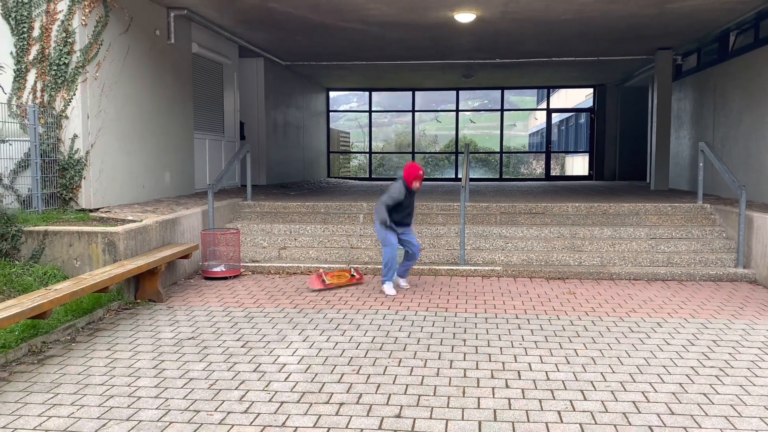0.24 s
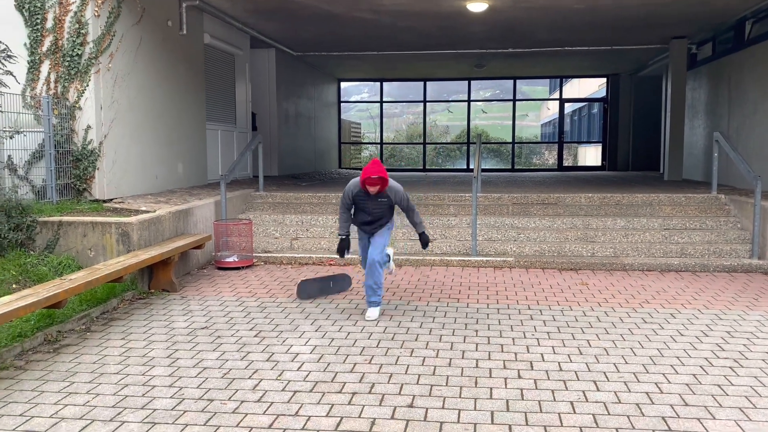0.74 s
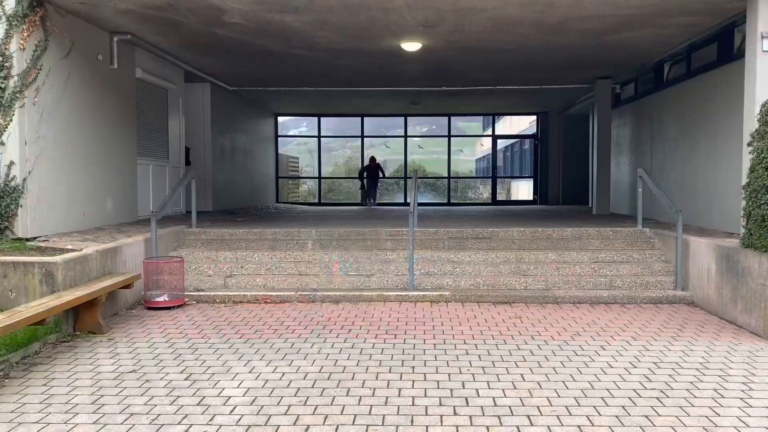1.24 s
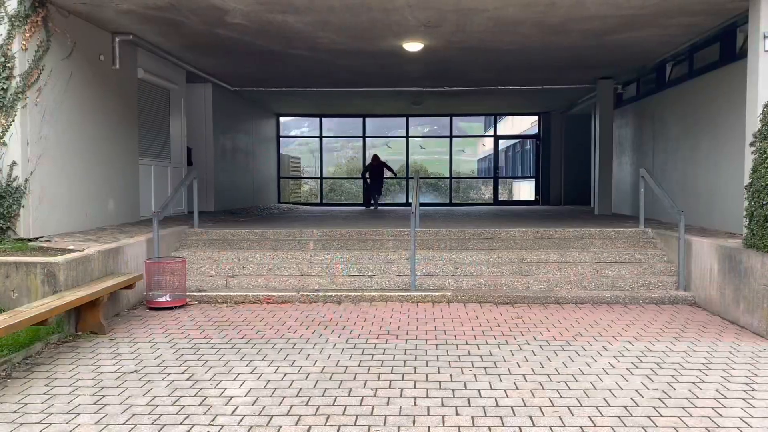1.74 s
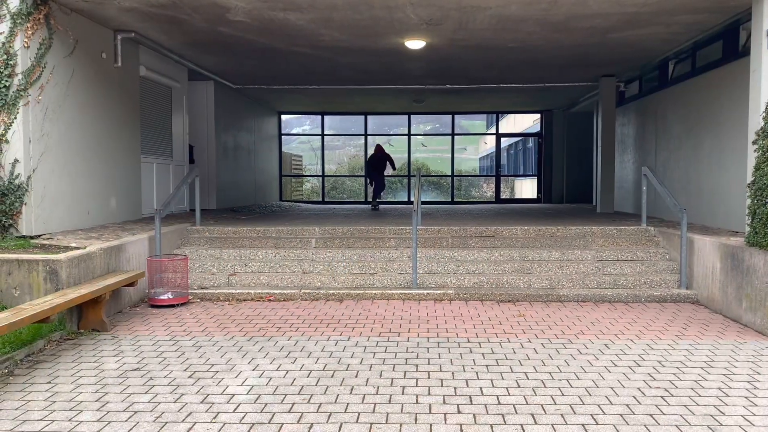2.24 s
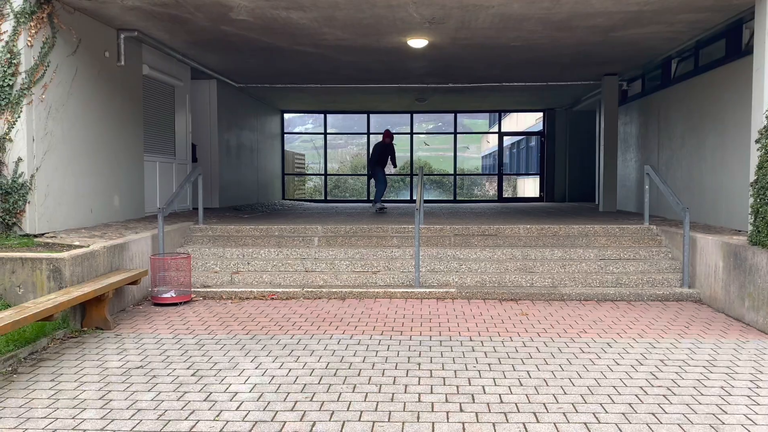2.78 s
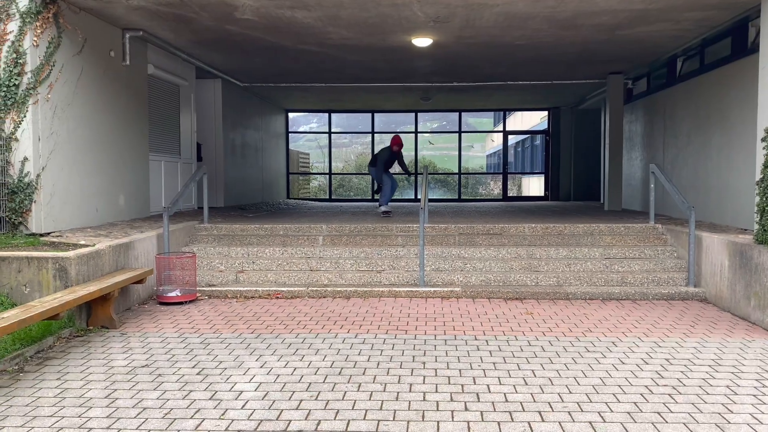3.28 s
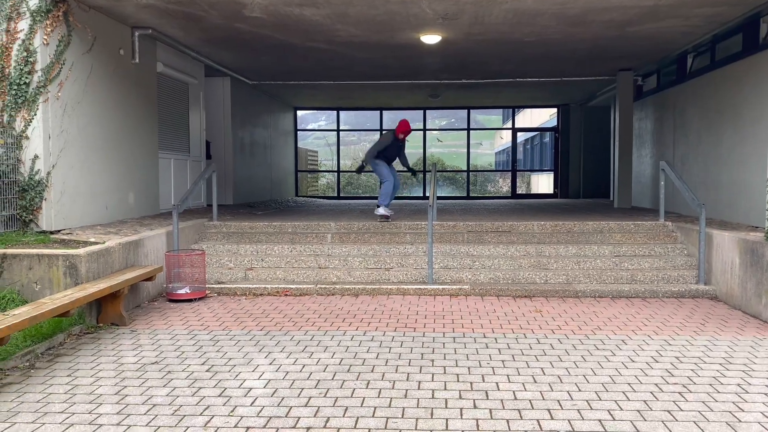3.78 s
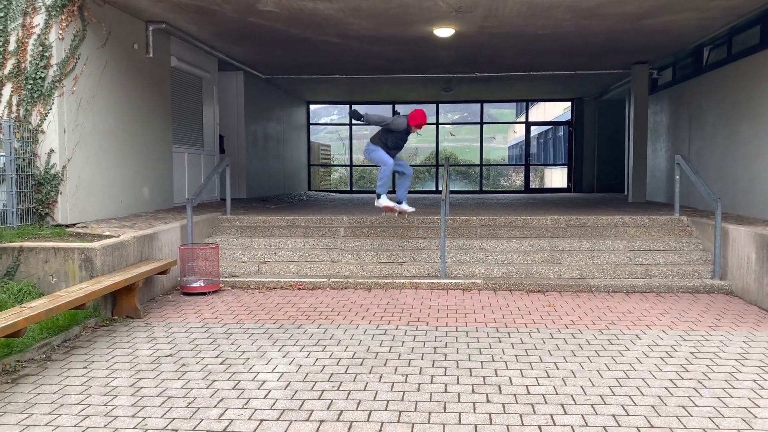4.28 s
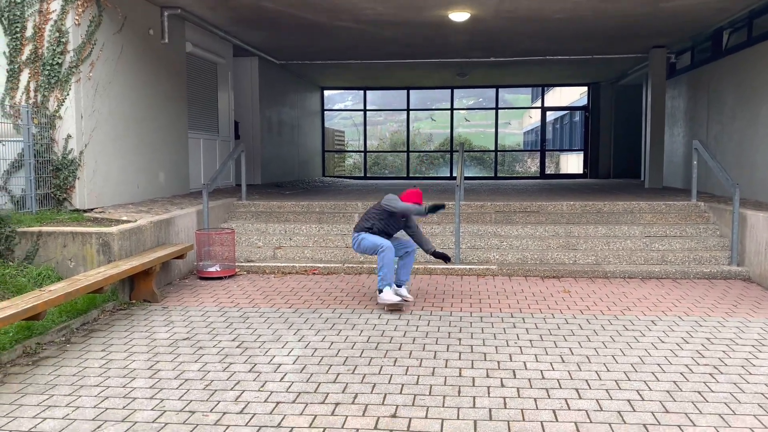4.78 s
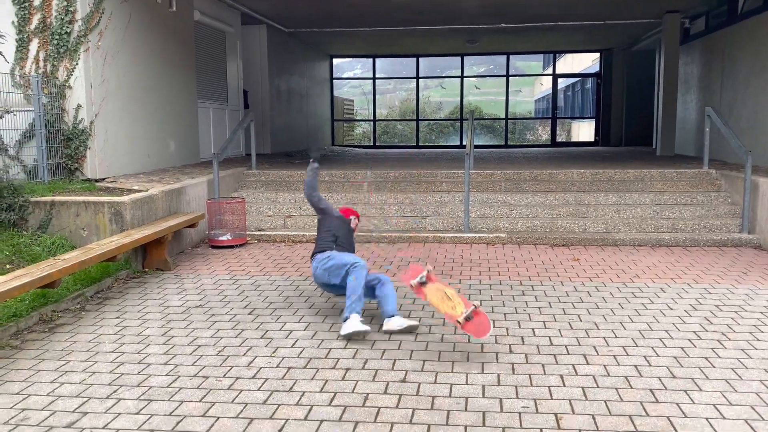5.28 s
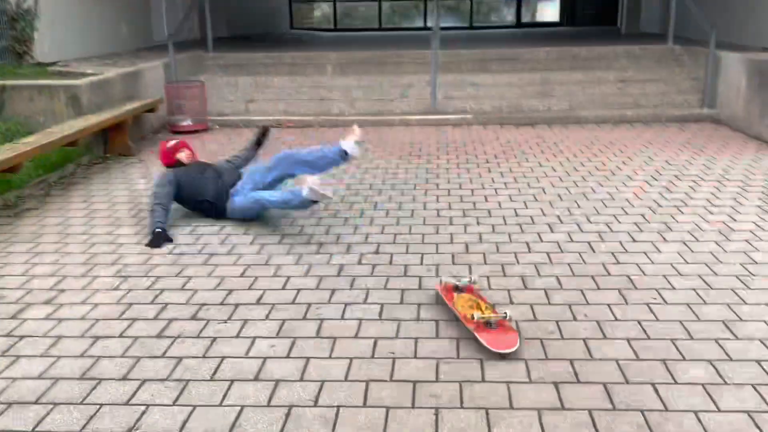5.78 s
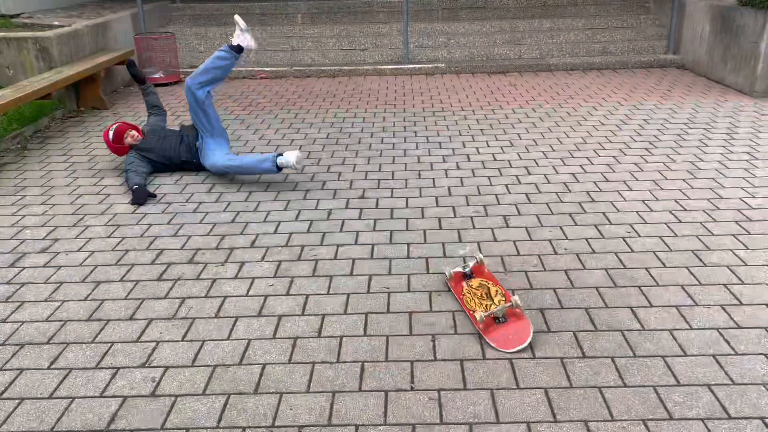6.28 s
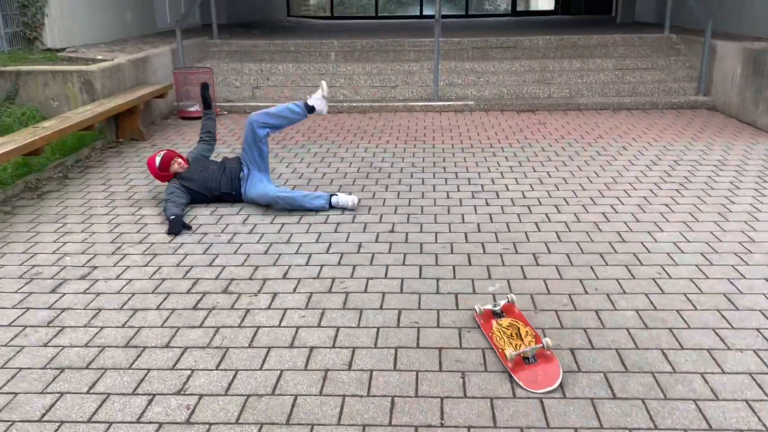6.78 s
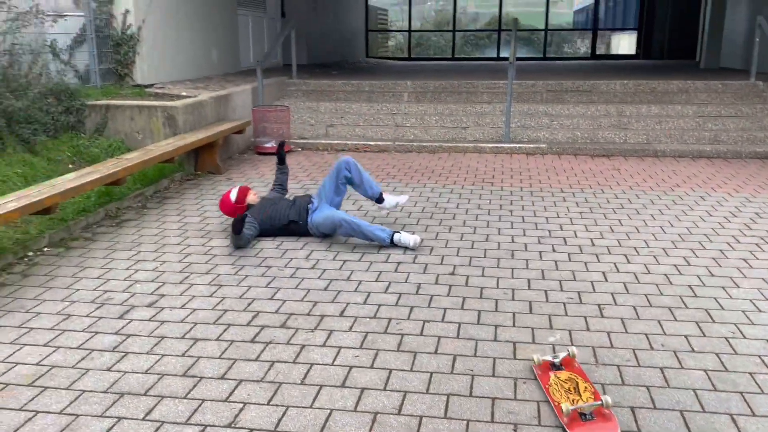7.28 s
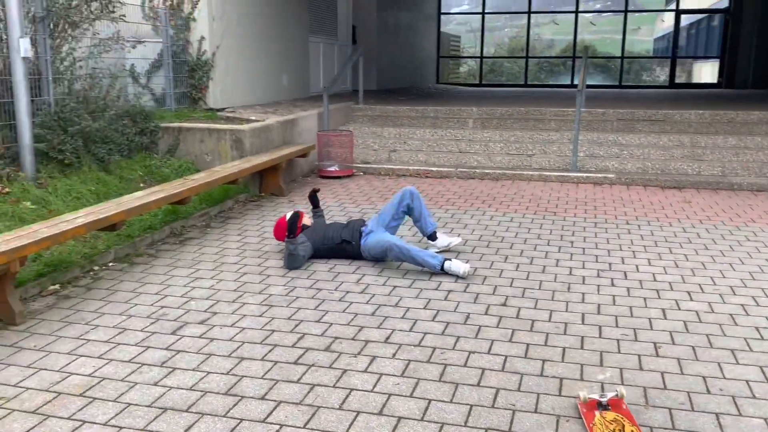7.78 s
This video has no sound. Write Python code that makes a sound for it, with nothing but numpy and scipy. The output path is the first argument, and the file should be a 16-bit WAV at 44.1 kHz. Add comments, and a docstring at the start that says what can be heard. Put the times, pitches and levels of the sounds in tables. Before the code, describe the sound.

A skateboard clatters down with whirring wheels, then after a cut it rolls, pops, slams down and tumbles in an echoing concrete passage.

```python
"""A skateboard clatters down at the foot of a stairway while its free wheels whirr; then a cut to a second attempt.
The board is thrown down in an echoing concrete passage, rolls closer, jolts over seams and pops off the ground.
It lands, slips away and tumbles onto its back, the rider falls, and the wheels spin on under gusts of wind.
Blows are contact noise ringing deck and truck modes; rolling and whirring are coloured, modulated noise;
shoes and body are damped swings, cloth is grainy noise, and decaying noise makes the echoes."""
import sys
import numpy as np
from scipy import signal
from scipy.fft import rfft, irfft, next_fast_len
from scipy.io import wavfile
from scipy.ndimage import uniform_filter1d, map_coordinates

SR = 44100
rng = np.random.default_rng(int(sys.argv[2]) if len(sys.argv) > 2 else 0)


def log_audio(samples):
    """Write samples as a 16-bit WAV file to the path given in sys.argv[1]."""
    # one column per channel
    frames = np.atleast_2d(samples).T
    # limit to full scale, then quantise
    limited = np.clip(frames, -1, 1)
    pcm = np.round(limited * 32767).astype(np.int16)
    wavfile.write(sys.argv[1], SR, pcm)


N = 354123
TIME = np.arange(N) / SR
CUT_S, ROCKING_S = 1.28, 4.7  # cut between the attempts; from the second time the board lies on its back
SKID_RING = 0.46  # factor on the deck's decay times in skids and jolts

# likeness of left and right in the passage: pitch_hz, likeness (0 to 1)
HALL_SAME = [(60, 0.7), (130, 0.98), (290, 0.96), (640, 0.13), (1300, 0.79), (3100, 0.047), (7000, 0.082)]
# spectrum of the passage echo: pitch_hz, level_db
HALL_TONE = [(60, -13.5), (150, -2.5), (280, 5.5), (450, 1), (1000, 3.5), (1900, 2), (3000, -4),
             (5000, -18), (7000, -20.5), (11000, -33), (16000, -49)]


def amp(db):
    """Turns decibels into a linear gain."""
    return 10 ** (np.asarray(db) / 20)


def evened(x):
    """Scales a sound to rms 1."""
    return x / np.sqrt(np.mean(x ** 2) + 1e-20)


def burst(x):
    """Scales a blow to the energy of six milliseconds at full level."""
    return x / np.sqrt(np.sum(x ** 2) / (.006 * SR) + 1e-20)


def read(points, hz):
    """Reads a table of values over log frequency."""
    f, value = np.transpose(points)
    return np.interp(np.log(hz + 1), np.log(f + 1), value)


def add(mix, s, sound):
    """Lays a sound into the mix at a time in seconds."""
    part = mix[..., max(round(s * SR), 0):][..., :sound.shape[-1]]
    part += sound[..., :part.shape[-1]]


def held(start, end, fade=0.04):
    """Attack, hold and release in straight lines."""
    return np.interp(TIME, [start - fade, start, end, end + fade], [0, 1, 1, 0])


def since(s):
    """Seconds gone by after a moment, zero before it."""
    return np.maximum(TIME - s, 0)


def colour(x, points, peaks=()):
    """Causal minimum-phase filter from a spectrum and a few resonances (Hz, width Hz, rise dB)."""
    hz = abs(np.fft.fftfreq(8192, 1 / SR))
    db = read(points, hz) + sum(rise / (1 + (2 * (hz - f) / width) ** 2) for f, width, rise in peaks)
    response = np.exp(np.conj(signal.hilbert(np.log(amp(db)))))
    taps = np.fft.ifft(response).real[:len(hz) // 2]
    taps = taps.reshape((1,) * (x.ndim - 1) + (-1,))
    return signal.oaconvolve(x, taps, axes=-1)[..., :x.shape[-1]]


def band(x, lo_hz, hi_hz):
    """Cuts out a band and scales it to rms 1."""
    edges = [lo_hz, min(hi_hz, SR / 2 - 1)]
    return evened(signal.sosfilt(signal.butter(3, edges, "band", fs=SR, output="sos"), x))


def pair(same, size):
    """Two channels of noise, as alike in each band as the table says."""
    padded = next_fast_len(size)
    a, b = rfft(rng.standard_normal((2, padded)))
    likeness = np.clip(read(same, np.fft.rfftfreq(padded, 1 / SR)), -.99, .99)
    mid, side = a * np.sqrt((1 + likeness) / 2), b * np.sqrt((1 - likeness) / 2)
    return irfft([mid + side, mid - side], padded)[:, :size]


def wobble(hz):
    """Random motion of rms 1, slower than about the given rate."""
    size = next_fast_len(N)
    slow = np.exp(-(np.fft.rfftfreq(size, 1 / SR) / hz) ** 2)
    return evened(irfft(rfft(rng.standard_normal(size)) * slow, size)[:N])


def smoothed(x, width_hz):
    """Spreads the energy of a burst of noise evenly over frequency."""
    size = next_fast_len(2 * len(x))
    z = rfft(x, size)
    power = uniform_filter1d(abs(z) ** 2, size=max(int(width_hz * size / SR), 1))
    return irfft(z / np.sqrt(abs(power) + 1e-20), size)[:len(x)]


def resonate(x, hz, width):
    """A resonance of gain 1 that follows a pitch curve."""
    turn = np.exp(2j * np.pi * np.cumsum(hz) / SR)
    r = np.exp(-np.pi * width / SR)
    # shift the pitch down to zero, smooth there, shift back
    return 2 * (turn * signal.lfilter([(1 - r) ** 2], [1, -2 * r, r * r], x / turn)).real


def outdoors():
    """Distant steady air with a faint hum, and lumpy gusts that swell and ebb on the microphone."""
    # distant air: pitch_hz, level_db
    air_tone = [(25, -24), (60, -3), (130, -7), (280, -5.5), (450, -15), (700, -12), (1500, -21),
                (4000, -34), (8000, -47), (15000, -63.5)]
    # wind on the microphone: pitch_hz, level_db
    wind_tone = [(20, -29.5), (50, 4.5), (85, 2.5), (150, -6), (250, -14.5), (500, -35.5), (1200, -66.5)]
    # gusts: peak_s, level_db, half_length_s
    gust_list = [(0.01, -33.5, 0.09), (0.3, -37.5, 0.17), (0.742, -37, 0.3), (1.17, -22.5, 0.067),
                 (4.654, -46.5, 0.12), (5.376, -36, 0.17), (5.782, -39, 0.033), (5.994, -49.5, 0.65),
                 (6.979, -33.5, 0.052), (7.236, -36.5, 0.14)]
    air = amp(-49.5) * evened(colour(pair(HALL_SAME, N), air_tone, [(124.0, 56, 13.4)]))
    air = air * amp(np.interp(TIME, [6.9, 7.5], [0, -4]))
    hum = amp(-66) * np.sin(2 * np.pi * 587 * TIME) * held(CUT_S, ROCKING_S)
    wind = evened(colour(pair([(25, 0.62), (70, 0.99), (300, 0.42)], N), wind_tone))
    wind = wind * amp(1.8 * wobble(5.5))
    gusts = np.sqrt(sum((amp(db) * np.exp(-((TIME - s) / half) ** 2)) ** 2 for s, db, half in gust_list))
    return air + hum + wind * gusts * amp([[1.], [-1.]])


def tail(t60s, build, same):
    """A diffuse echo that builds up and dies band by band."""
    hz, t, z = signal.stft(pair(same, 2 * SR), SR, nperseg=512)
    response = signal.istft(z * amp(-60 * t / read(t60s, hz)[:, None]), SR, nperseg=512)[1]
    response = response * (1 - np.exp(-np.arange(response.shape[1]) / SR / build))
    return response / np.sqrt(np.mean(abs(rfft(response)[:, 1000:5000]) ** 2))


def echo(x, response):
    """Passes a sound through a room response."""
    return signal.oaconvolve(np.atleast_2d(x), np.atleast_2d(response), axes=1)[:, :N]


def scattered(power, spread=0.034):
    """Steps and ceiling scatter each blow into a short wash before the passage rings with it."""
    # share sent into the passage, falling as the board comes out towards the microphone: time_s, level_db
    hall_send = [(.2, -6), (1.9, -2), (2.25, -10.5), (5., -10.5), (6.3, -17.5)]
    t = np.arange(SR // 2) / SR
    shape = burst(t * np.exp(-t / spread)) ** 2
    envelope = np.sqrt(abs(signal.oaconvolve(power, shape)[:N]))
    wash = evened(colour(rng.standard_normal(N), HALL_TONE, [(267, 19, 3.4)]))
    return envelope * wash * amp(np.interp(TIME, *np.transpose(hall_send)))


def at_the_stairs(x):
    """Colours the first attempt by its place."""
    # bare board at the foot of the stairs, its top dulled by distance: pitch_hz, level_db
    stairs_tone = [(150, -1), (250, 2.5), (400, -1.5), (700, 3), (1100, -1), (2000, -0.5), (3000, 1.5),
                   (4200, 0), (6500, -2.5), (11000, 1)]
    return colour(x * (TIME < CUT_S), stairs_tone) + x * (TIME >= CUT_S)


def to_the_right(x):
    """The board starts on the left and ends on the right, where it reaches the left port later."""
    # delay of the left port: time_s, delay_ms
    left_lag = [(1.27, -.07), (1.29, -.018), (4.6, -.015), (5.5, 0), (6.3, .05), (8., .11)]
    lag = np.interp(TIME, *np.transpose(left_lag)) / 1000
    left = map_coordinates(x[0], [(TIME - lag) * SR], order=3, mode="nearest")
    return np.array([left, x[1]])


def rider(slap=0.68, rub_low=0.55, rub_high=1.26, rub_grain_db=3.0):
    """Dull thuds of shoes and body, each a damped swing with a soft slap, and short grainy brushes of cloth."""
    # soft blows of shoes and body: start_s, level_db, pitch_hz, give_s
    thuds = [(0.188, -14.5, 253, 0.0072), (0.55, -21, 228, 0.0029), (0.683, -16, 279, 0.012),
             (0.8, -18, 244, 0.012), (0.911, -25, 131, 0.0072), (1.083, -24.5, 255, 0.0061),
             (1.169, -37.5, 238, 0.0093), (1.464, -35.5, 288, 0.0085), (2.25, -12, 195, 0.015),
             (3.855, -7.5, 201, 0.019), (4.545, -15, 212, 0.0049), (4.87, -18, 217, 0.013),
             (5.307, -16, 182, 0.0062), (5.366, -20.5, 192, 0.0087), (5.399, -25.5, 148, 0.014),
             (5.828, -25.5, 166, 0.013), (7.195, -41, 348, 0.0047), (7.428, -41, 297, 0.0023),
             (7.459, -44, 268, 0.0021), (7.636, -44, 283, 0.002)]
    # cloth and soles brushing the ground: start_s, length_s, level_db, centre_hz
    brushes = [(0.392, 0.0079, -40.5, 6960), (1.459, 0.044, -56.5, 2340), (1.704, 0.28, -63.5, 2410),
               (3.873, 0.013, -30, 3080), (5.085, 0.026, -41.5, 3160), (5.191, 0.073, -45.5, 5450),
               (5.321, 0.015, -42, 6000), (5.366, 0.078, -34, 2430), (6.471, 0.011, -37.5, 1400),
               (6.958, 0.011, -51, 3200), (7.191, .012, -45, 1000), (7.194, 0.034, -52, 2785),
               (7.364, 0.0045, -52, 5660), (7.427, 0.012, -46, 1500), (7.918, 0.08, -40.5, 2430),
               (8, 0.013, -38, 1840)]
    # sole or cloth meeting the ground: pitch_hz, level_db
    slap_tone = [(30, -16.5), (110, 1.5), (250, 5), (600, -9), (1100, -14), (2500, -36), (9000, -76)]
    t, out = np.arange(SR // 5) / SR, np.zeros(N)
    for s, db, hz, give in thuds:
        push = t * np.exp(-t / give)
        contact = evened(colour(rng.standard_normal(len(t)), slap_tone))
        add(out, s, amp(db) * burst(push * (np.sin(2 * np.pi * hz * t) + slap * contact)))
    for s, length, db, hz in brushes:
        fibres, catches = rng.standard_normal((2, SR // 3))
        catching = amp(rub_grain_db * evened(uniform_filter1d(catches, size=200)))
        rub = evened(band(fibres * catching, hz * rub_low, hz * rub_high)[:int(length * SR)])
        add(out, s, amp(db) * rub * signal.windows.tukey(len(rub), .6))
    return out


def stomps():
    """The rider's feet land on the deck: each bends it, and it swings back in a low knock."""
    # landing feet: start_s, level_db
    feet = [(2.059, -16), (2.108, -16), (2.134, -21), (2.165, -18)]
    flex_hz, flex_t60_s, sole_s = 283, 0.051, 0.004  # bending mode of the deck; give of a sole
    t, out = np.arange(SR // 5) / SR, np.zeros(N)
    knock = np.sin(2 * np.pi * flex_hz * t) * (1 - np.exp(-t / sole_s)) * amp(-60 * t / flex_t60_s)
    for s, db in feet:
        add(out, s, amp(db) * burst(knock))
    return out


def spinning(fade_out_s=0.18):
    """Loudness and speed of the free wheels: spins fade at their own rates, and louder ones weigh more in the speed."""
    # wheels leave the ground spinning: start_s, level_db, fade_db_per_s (negative swells), turns_per_s
    spins = [(0.22, -43, 3, 42), (0.48, -29.5, 21, 35), (4.25, -47.5, 1.5, 50), (5.03, -35.5, -2, 32),
             (5.749, -25, 13.5, 37), (6.3, -44.5, 0, 24)]
    spin_up_s, grazed_s, graze_db_per_s = 0.025, 5.88, 22.5  # rise; the tumble then brakes earlier spins
    powers = []
    for s, db, fade, turns in spins:
        braking = graze_db_per_s * since(grazed_s) * (s < grazed_s)
        gain = amp(db - fade * since(s) - braking) * np.minimum(since(s) / spin_up_s, 1)
        if s < CUT_S:
            gain = gain * np.clip((CUT_S - TIME) / fade_out_s, 0, 1)
        powers.append(gain ** 2 + 1e-14)
    total = np.sum(powers, axis=0)
    speed = np.transpose(spins)[-1] @ np.array(powers) / total
    return np.sqrt(total), speed


def free_wheels(whirr=0.12, ball_ticks=0.17, fizz_db=-26.0, fizz_db_per_turn=7.0):
    """Bearings whirr in the air, throbbing with each turn and each passing ball; faster wheels fizz more."""
    # bearing noise: pitch_hz, level_db
    bearing_tone = [(250, -22), (600, -10), (850, -9), (1000, -2), (1500, -7), (2300, -10.5), (2650, -23.5),
                    (3300, -21), (4000, -30.5), (5300, -33.5), (6900, -28), (8300, -40.5), (11000, -37.5),
                    (16000, -52.5)]
    # its resonances: pitch_hz, width_hz, rise_db
    bearing_rings = [(1129, 140, 5.5), (1700, 45, 4.5), (3195, 58, 6), (6300, 560, 5)]
    full_fizz_turns = 33  # turns a second from which the fizz grows no more
    far_fizz_db = -15  # the first attempt's fizz hardly carries from the foot of the stairs
    gain, speed = spinning()
    turns = np.cumsum(speed * (1 + 0.016 * wobble(5))) / SR
    throb = 1 + whirr * np.sin(2 * np.pi * turns) + ball_ticks * np.sin(2 * np.pi * 2.2 * turns)
    noise = pair([(600, 0.12), (1200, 0.63), (3000, 1.0), (7000, 0.4)], N)
    sound = evened(colour(noise, bearing_tone, bearing_rings))
    wavering = (TIME + 0.0012 * wobble(4)) * SR  # the pitch wavers
    sound = np.array([map_coordinates(channel, [wavering], mode="nearest") for channel in sound])
    speed_db = fizz_db_per_turn * np.minimum(speed - full_fizz_turns, 0)
    fizz_gain = amp(fizz_db + speed_db + far_fizz_db * (TIME < CUT_S))
    fizz = band(rng.standard_normal((2, N)), 5500, 11000) * fizz_gain
    flutter = amp(1.3 * wobble(12))
    return (sound + fizz) * throb * flutter * gain


def drone():
    """The floor shakes the deck's bending resonance, which sinks under the crouching rider's weight."""
    # the loaded deck: time_s, pitch_hz, level_db
    drone_path = [(2.7, 316.5, -25.5), (3.05, 306, -24), (3.22, 234, -36), (3.45, 190, -23.5),
                  (3.65, 152, -33), (3.82, 112, -23.5), (3.96, 105, -47)]
    s, hz, db = np.transpose(drone_path)
    t, out = np.arange(s[0], s[-1], 1 / SR), np.zeros(N)
    swing = evened(resonate(rng.standard_normal(len(t)), np.interp(t, s, hz), 29))  # 29 Hz wide
    add(out, s[0], swing * amp(np.interp(t, s, db)) * signal.windows.tukey(len(t), .05))
    return out


def rolling(bump_db=0.6, sparkle_db=2.0, joint_db=3.5, coarse_db=1.35):
    """Wheels run over countless small bumps; grit crackles under them, and paving joints make it rougher."""
    # rolling noise: pitch_hz, level_db
    roll_tone = [(21, -92), (35, -27), (107, -9.5), (177, 1.5), (318, 1.5), (584, -5), (1250, -5),
                 (4120, -38.5), (6500, -40), (8160, -45.5), (9270, -60), (10000, -55.5), (11300, -53.5),
                 (13200, -65), (15000, -51)]
    # standing waves of the passage: pitch_hz, width_hz, rise_db
    booms = [(114.5, 23, 7.5), (169, 32, 1.5), (317, 45, 1), (654, 32, 4)]
    run_up_s, coast_s, crouch_s, pop_s = 2.3, 3.1, 3.43, 3.96  # on the board, last push, knees bent, take-off
    touchdown_s, slip_s = 4.59, 4.98  # the short ride on the paving
    paving = held(touchdown_s, slip_s)
    surge_db = 0.6
    roughness_db = bump_db * wobble(56) + surge_db * wobble(7.8) + joint_db * paving * wobble(87)
    road = colour(pair(HALL_SAME, N) * amp(roughness_db), roll_tone, booms)
    roar = band(road, 510, 2130) * amp(coarse_db * wobble(33))
    rumble = band(road, 26, 330)
    grit = band(road, 2900, 15500) * amp(sparkle_db * wobble(320))
    # loose trucks and bearings rattle at speed and calm down in the coast
    rattle = evened(band(road, 1120, 1980) * amp(5.0 * wobble(60)))

    # the board gathers speed until the last push, then coasts to the mouth of the passage
    coasted, pushing = since(coast_s), np.maximum(coast_s - TIME, 0)
    run_up = roar * amp(-18 - 1 * pushing - 6.5 * coasted)
    run_up = run_up + rumble * amp(-22.5 + 0.7 * (TIME - coast_s))  # grows as the board comes closer
    run_up = run_up + grit * amp(-33.5 - 4.5 * coasted)
    run_up = run_up + rattle * amp(-35 - 29 * coasted)
    crouch = band(road, 60, 118) * amp(-37) * held(crouch_s, pop_s)  # the loaded deck rumbles deeper

    ride = roar * amp(-24.5) + rumble * amp(-33) + grit * amp(-38.5)
    nearing = amp(11.5 * np.minimum(TIME - slip_s, 0))  # grows louder up to the slip, in dB per s
    return run_up * held(run_up_s, pop_s) + crouch + drone() + ride * paving * nearing


def blow(force, hz, thump_db, crack_db, ring, favoured=(), dense=0.74,
         knock_t60=0.035, thump_t60=0.077, crack_t60=0.065, octaves=1.0):
    """A contact force rings the deck; each place of contact favours other modes."""
    # maple deck with its trucks: pitch_hz, level_db, t60_s
    deck = [(727, 4, 0.066), (950, -1.5, 0.074), (1005, 0.5, 0.11), (1171, 0, 0.095), (1510, 0, 0.0096),
            (1530, 1.5, 0.049), (1720, 0.5, 0.03), (1945, 0.5, 0.049), (2220, 3, 0.03), (2372, -5.5, 0.084),
            (2710, 0.5, 0.036), (3530, -3, 0.01), (3920, -7.5, 0.027), (4500, -13.5, 0.025)]
    # the deck bending: pitch_hz, level_db
    thump = [(40, -30), (120, -20.5), (250, 4), (350, -4.5), (470, -1), (620, -10), (1000, -40)]
    # its dense upper modes: pitch_hz, level_db
    knock = [(200, -32), (600, 2), (1000, 1), (2000, -3), (3000, -8), (4500, -22.5), (9000, -61)]
    # grit crushed at contact: pitch_hz, level_db
    crack = [(1500, -31), (3000, 8), (3800, 6), (4700, 0.5), (5400, -3.5), (6800, -5.5), (8200, -20.5),
             (11000, -28), (16000, -43.5)]
    t = np.arange(len(force)) / SR
    modes = np.zeros(len(t))
    # a random place shifts each mode's level and pitch and sets its sign
    place = rng.standard_normal((len(deck), 2)) * [1.5, 1]
    for (f, db, t60), (a, b) in zip(deck, place):
        swing = np.sign(b) * np.sin(2 * np.pi * f * (1 + 0.023 * b) * t)
        modes += amp(db + a - 60 * t / (t60 * ring)) * swing
    contact = smoothed(force * rng.standard_normal(len(t)), 300)
    modes = signal.fftconvolve(modes, contact)[:len(t)]

    def dying(spectrum, t60):
        """Modes too dense to tell apart: coloured noise that dies away after the force."""
        power = signal.fftconvolve(force ** 2, amp(-120 * t / t60))[:len(t)]
        noise = np.sqrt(abs(power)) * rng.standard_normal(len(t))
        return burst(colour(smoothed(noise, 400), spectrum))

    # the hardness of the contact centres the ring on one region
    grid = np.geomspace(100, 16000, 24)
    focus = np.transpose([grid, -6 * np.minimum((np.log2(grid / hz) / octaves) ** 2, 3)])
    wood = burst(colour(burst(modes) + dense * dying(knock, knock_t60 * ring), focus, favoured))
    return wood + amp(thump_db) * dying(thump, thump_t60) + amp(crack_db) * dying(crack, crack_t60 * ring)


def truck_ring(unevenness_db=3.5):
    """Metal modes of the trucks; each blow favours other ones."""
    # metal trucks: pitch_hz, level_db, t60_s
    trucks = [(2660, 0.5, 0.032), (3560, -10.5, 0.047), (3820, 2.5, 0.025), (4340, 2, 0.012),
              (4530, -3.5, 0.03), (4960, -7, 0.033), (5850, -8.5, 0.035), (6470, -14, 0.03)]
    t = np.arange(SR // 10) / SR
    place = rng.standard_normal((len(trucks), 2))
    ringing = np.zeros(len(t))
    for (hz, db, t60), (a, b) in zip(trucks, place):
        decay = amp(db + unevenness_db * a - 60 * t / t60)
        ringing += decay * np.sign(b) * np.sin(2 * np.pi * hz * t)
    return burst(ringing)


def jolts(direct):
    """The wheels jolt over seams in the passage floor, cushioned by their softness."""
    # seams: start_s, level_db
    seams = [(2.655, -13.5), (2.763, -30), (2.906, -19), (2.925, -19), (2.979, -14), (3.048, -15.5),
             (3.111, -15.5), (3.178, -16), (3.209, -18), (3.292, -18), (3.533, -14.5)]
    # cushioning of the soft wheels: pitch_hz, level_db
    jolt_tone = [(1750, 0.5), (2400, -12), (6000, -4)]
    t = np.arange(SR // 18) / SR
    for s, db in seams:
        force = t * np.exp(-t / 0.00057)  # contact time in s
        jolt = blow(force, hz=1380, thump_db=-12, crack_db=-20, ring=SKID_RING)
        add(direct, s, amp(db) * colour(jolt, jolt_tone))


def bending(s, db):
    """Thump relative to its blow: harder contacts are shorter, so the bass grows more slowly than the clack."""
    full_db, growth = -18.5, 0.59  # thump of a full-level skid; dB it gains per dB of skid
    return full_db + (growth - 1) * db - 6.5 * (s > ROCKING_S)  # on its back the board bends less


def skids(direct, power):
    """Glancing blows of wheels or an edge, whose contact force swells and ebbs while the skid damps the deck."""
    # skids: start_s, level_db, centre_hz, swell_s, crack_db (relative to the blow)
    skid_list = [(0.222, -12.5, 3300, 0.00068, -5), (0.258, -16.5, 1990, 0.0018, -12),
                 (0.691, -17, 1230, 0.007, -13), (0.783, -21, 1160, 0.004, -8.5),
                 (0.976, -27, 1460, 0.0052, -12), (1.914, -14, 1850, 0.0047, -11.5),
                 (1.94, -19.5, 1310, 0.0039, -21), (2.031, -6.5, 2220, 0.0032, -14),
                 (2.063, -9, 1590, 0.0095, -15), (2.235, -8, 1110, 0.01, -11.5),
                 (2.262, -3.5, 1160, 0.015, -20.5), (4.044, -19, 1870, 0.0071, -18),
                 (4.621, -18.5, 1350, 0.0044, -18), (4.645, -16, 1410, 0.0059, -22),
                 (4.885, -14.5, 1200, 0.0036, -18), (5.612, -17.5, 1850, 0.0053, -16),
                 (5.789, -23, 1090, 0.0031, -14), (5.931, -18.5, 1180, 0.0033, -16.5),
                 (5.987, -23.5, 1530, 0.0039, -22)]
    t = np.arange(SR // 9) / SR
    for s, db, hz, swell, crack_db in skid_list:
        rise = (t / swell) ** 0.97
        force = rise * np.exp(-rise * 2 / 3)
        add(direct, s, amp(db) * blow(force, hz, bending(s, db), crack_db, SKID_RING))
        add(power, s, amp([db]) ** 2)


def clacks(direct, power):
    """Sharp blows: a short contact, a brief slapping on of the flexing deck, and the ring of the trucks."""
    # blows: start_s, level_db, centre_hz, crack_db, thump_db (both relative to the blow), low_ring_hz, high_ring_hz
    clack_list = [(0.188, -7, 1590, -7.5, -7, 890, 2800), (0.223, -10.5, 2000, -26, -12, 690, 2950),
                  (0.548, -17.5, 1020, -11.5, -3.5, 835, 2940),
                  (0.681, -12, 1970, -10.5, -11.5, 1000, 2180), (0.81, -19, 1200, -14, -0.5, 800, 3110),
                  (0.905, -25.5, 970, -5.5, 1, 950, 2810), (1.019, -31.5, 2600, -6.5, -4, 990, 3110),
                  (3.974, -7.5, 1610, -13.5, -15, 1390, 1894), (4.53, -4, 1520, -13, -13, 1180, 1730),
                  (4.534, -10, 1300, -18, -9, 1150, 1770), (4.549, -10.5, 1110, -19, -4.5, 980, 1970),
                  (4.638, -13.5, 1390, -23, -17, 1040, 1970), (4.759, -27, 1050, -22, -12, 950, 1770),
                  (4.81, -24, 1210, -25, -2, 1350, 1810), (4.854, -17.5, 1600, -17.5, -0.5, 660, 1790),
                  (4.888, -18.5, 1490, -21, -5, 1050, 1950), (4.926, -14.5, 1350, -11.5, -2, 950, 2300),
                  (4.964, -20, 1290, -17, -2, 1000, 1900), (4.979, -12, 1790, -7, -25, 1480, 1890),
                  (4.986, -10, 1860, -8.5, -18, 1490, 1930), (5.451, -8.5, 1740, -17, -11, 1470, 1830),
                  (5.494, -8, 2130, -17, -10.5, 1600, 2520), (5.524, -18, 2380, -9.5, -29, 1580, 1920),
                  (5.548, -9, 2100, -12.5, -18, 1540, 2020), (5.76, -9, 1870, -21.5, -14, 1590, 1940),
                  (5.83, -9, 1720, -19, -9, 1290, 2080), (5.861, -13, 1450, -21, -11, 1540, 1970),
                  (6.07, -12, 1780, -24, -16, 1450, 1920), (6.081, -7.5, 1690, -25.5, -18, 1020, 1890),
                  (6.164, -15.5, 1330, -25, -12, 1480, 1800), (6.257, -24.5, 1590, -10.5, -5, 1480, 2270),
                  (6.317, -25, 1390, -23, -7, 1450, 1550)]
    # the two rings that a place of contact favours: width_hz, rise_db
    low_ring = (140, 7.4)
    high_ring = (320, 8.1)
    contact_s, chatter_s, chatter_share = 0.00067, 0.0036, 0.22
    truck_db = -5.5  # relative to the crack of the blow
    t = np.arange(SR // 18) / SR
    contact = t / contact_s * np.exp(-t / contact_s)
    chatter = chatter_share * t / chatter_s * np.exp(-t / chatter_s)
    for s, db, hz, crack_db, thump_db, low_hz, high_hz in clack_list:
        favoured = [(low_hz, *low_ring), (high_hz, *high_ring)]
        clack = blow(contact + chatter, hz, thump_db, crack_db, ring=0.37, favoured=favoured)
        add(direct, s, amp(db) * clack)
        add(direct, s, amp(db + crack_db + truck_db) * truck_ring())
        add(power, s, amp([db]) ** 2)


def board():
    """All blows of the board, and a train that holds the power of each clack and skid."""
    direct, power = np.zeros(N), np.zeros(N)
    clacks(direct, power)
    skids(direct, power)
    jolts(direct)
    return direct, power


def scene():
    """Two attempts joined by a cut, each with the echo of the passage and of the nearby walls."""
    # decay of the passage: pitch_hz, t60_s
    hall_t60 = [(100, 1.26), (260, 1.63), (700, 1.68), (1840, 1.01), (4850, 0.88), (12000, 0.18)]
    direct, power = board()
    roll = rolling()
    near = at_the_stairs(direct) + rider() + stomps()
    sent = at_the_stairs(scattered(power))
    hall = tail(hall_t60, 0.036, HALL_SAME)
    walls = tail([(200, 0.1), (2000, 0.13), (10000, 0.19)], 0.0099,
                 [(150, 0.94), (600, 0.13), (1300, 1.0), (3000, 0)])

    # scatter around the body that holds the microphone, opposite in the two ports
    ports = tail([(200, 0.013), (10000, 0.0077)], 0.00045, [(100, 0.0051), (10000, 0.0014)])[0]
    side_tone = [(100, -24.0), (300, -17.0), (600, -1.5), (1200, -11.5), (2100, -10.0), (4200, -15), (7500, -2.5)]
    side = echo(colour(near, side_tone), ports)
    close = to_the_right(near + side * np.array([[1], [-1]]) + free_wheels())
    close = close + amp(-12) * echo(near, walls)

    first = echo(sent * (TIME < CUT_S), hall)
    # the passage still rings from the run-up
    add(first, 0, amp(-48) * evened(colour(hall, HALL_TONE)[:, SR // 4:]))
    first *= np.clip((CUT_S - TIME) / .03, 0, 1)
    roll_sent = amp(-4.0) * roll.mean(0) * np.where(TIME < 4.3, 1, .4)
    second = echo(sent * (TIME > CUT_S) + roll_sent, hall)
    return close + roll * amp([[.4], [-.4]]) + first + second + outdoors()


def record(dry):
    """A quick fade through the cut, microphone colour, a soft ceiling on the loudest blows, and the band limit."""
    # microphone response: pitch_hz, level_db
    microphone = [(20, -2.5), (8200, -2.5), (9200, -19), (10000, -0.5), (12000, -4), (13200, -34),
                  (14500, -10.5), (16000, -19.5)]
    edge_hz = 15900
    splice = np.interp(TIME - CUT_S, [-.02, 0, .006, .025], [1, .08, .1, 1])
    x = colour(dry * splice, microphone)
    x = x / (1 + (x / .95) ** 8) ** (1 / 8)
    lowpass = signal.firwin(511, edge_hz, window=("kaiser", 9), fs=SR)
    return signal.oaconvolve(x, lowpass[None], "same")


dry = scene()
out = record(dry)
log_audio(out)
```